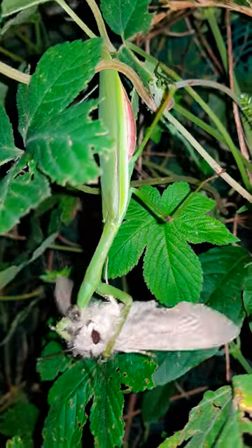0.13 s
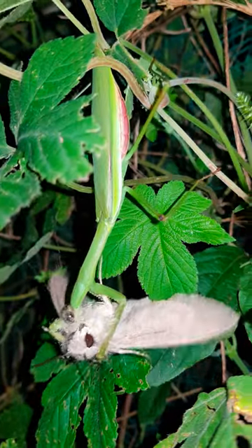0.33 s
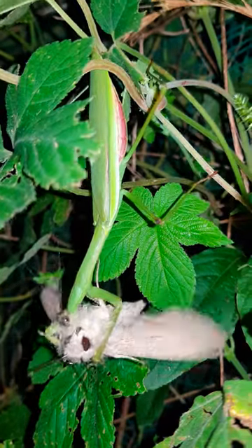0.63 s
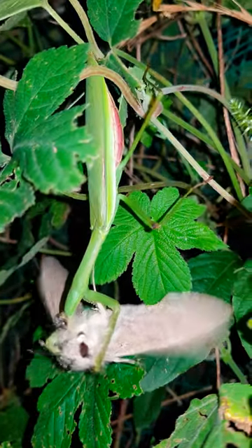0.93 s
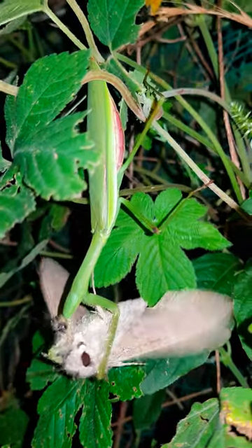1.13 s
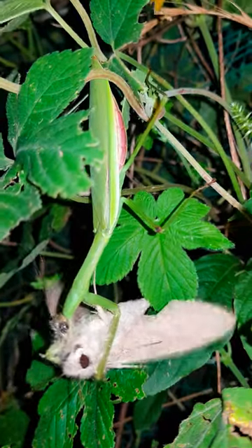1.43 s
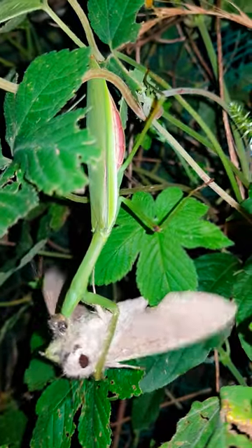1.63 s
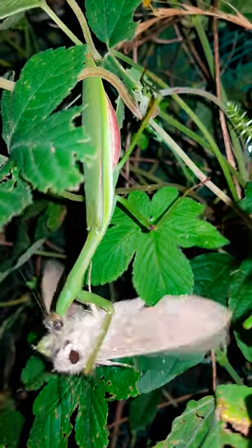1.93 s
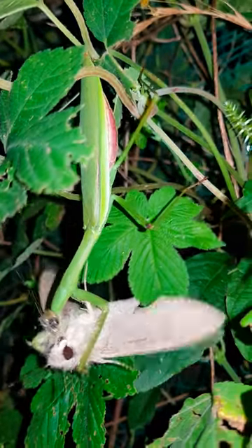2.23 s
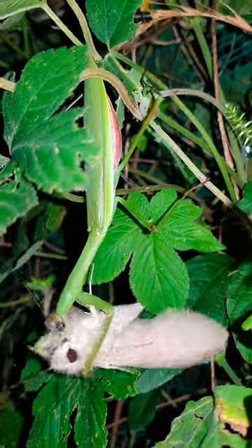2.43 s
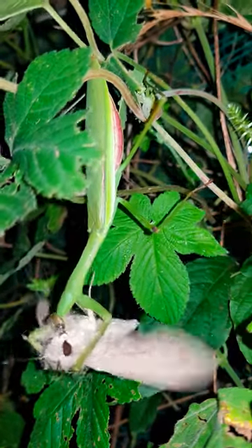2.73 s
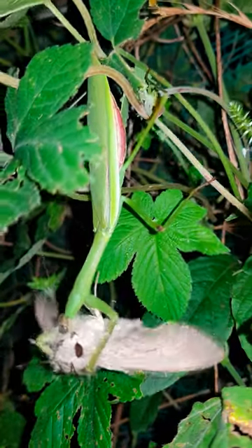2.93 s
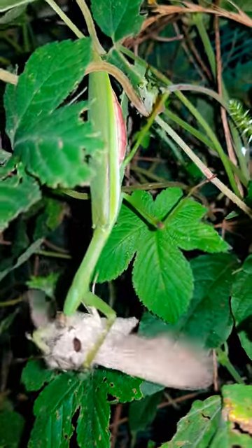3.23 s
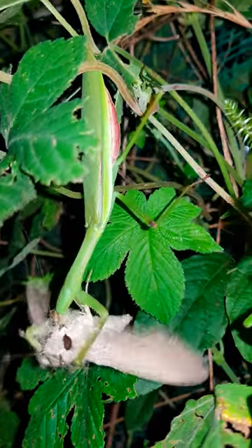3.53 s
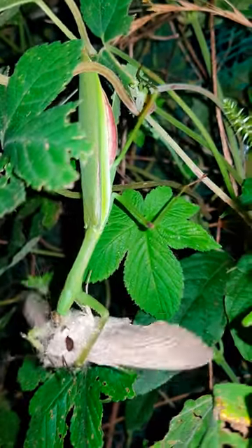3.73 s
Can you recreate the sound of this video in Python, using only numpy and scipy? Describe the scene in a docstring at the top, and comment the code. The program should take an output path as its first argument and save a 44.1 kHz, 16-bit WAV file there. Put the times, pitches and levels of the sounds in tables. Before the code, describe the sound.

Night insects trill and rasp continuously in weedy vegetation over a low distant vehicle rumble that grows.

```python
"""Insects in a verge at night

Crickets and katydids sing near and far in a weedy verge while a vehicle draws closer on a distant road.
Each cricket pulse is one wing stroke, a short tone sliding down; katydids rasp in bursts of treble noise.
The vehicle and the blur of far insects are shaped noise; a chorus sums many scattered strokes.
Small knocks are damped rings, and leaves and ground scatter the crickets and knocks into a short tail."""
import sys
import numpy as np
from scipy import signal
from scipy.io import wavfile
from scipy.ndimage import uniform_filter1d

SR = 44100
rng = np.random.default_rng(int(sys.argv[2]) if len(sys.argv) > 2 else 0)


def output_pcm(signal):
    """Save a mono or channel-first signal as 16-bit PCM at the path in sys.argv[1].

    Samples are clipped to [-1, 1] before scaling.
    """
    pcm = np.clip(np.atleast_2d(signal).T, -1, 1) * 32767
    wavfile.write(sys.argv[1], SR, np.round(pcm).astype(np.int16))


def boost(x):
    """Linear amplitude factor 10**(x/20) for a level x in decibels (scalar or array-like)."""
    u = np.asarray(x, float) / 20
    return 10 ** u


N = 170667
T = np.arange(N) / SR  # time in s

# Levels in the tables are relative; some sources are scaled again where they are mixed.
# Pan is left minus right.

# distant vehicle: [t/s, engine rumble level/dB, tyre roar level/dB, tyre hiss level/dB]
VEHICLE_SWELL = [(0, -46.5, -46, -53.5), (.5, -45.5, -48.5, -51), (1, -45, -46, -48.5),
                 (1.6, -44.5, -46.5, -47), (2, -44.5, -43.5, -50.5), (2.8, -43.5, -45, -46),
                 (3, -42, -38.5, -44.5), (3.5, -41, -39.5, -44.5), (3.75, -39.5, -33, -44.5),
                 (3.87, -37.5, -28.5, -45)]
# mean spectrum of the road: [f/Hz, density level/dB per Hz]
ROAD_SPECTRUM = [(24, -27), (40, -7.5), (81, 2.5), (141, -6), (220, -2), (270, -6), (395, -11), (453, -8),
                 (538, -10.5), (685, -2.5), (800, -4), (1170, -7.5), (1440, -16), (1710, -15),
                 (2030, -25.5), (2450, -27.5), (3180, -40), (5390, -120)]
# likeness of the road noise at left and right: [f/Hz, likeness 0 to 1]
ROAD_LIKENESS = [(60, 1), (300, 0.95), (700, 0.97), (1400, 0.69), (2500, 0.2)]
# side of the road noise: [f/Hz, pan/dB]
ROAD_SIDE = [(60, 0), (380, 4), (700, 1.5), (1300, 0.5), (2400, 4)]

# spectrum of the blur of far insects: [f/Hz, density level/dB per Hz]
FAR_SPECTRUM = [(1500, -74), (2500, -12), (3100, -23), (3640, -13), (4640, -9.5), (5660, -22),
                (6020, -18.5), (6510, -6.5), (7000, -3.5), (7400, -4.5), (8080, -13.5), (8820, -35),
                (9100, -31), (9700, -27.5), (10900, -22), (12700, -21), (15000, -17.5), (15900, -19.5)]
# side of the far insects: [f/Hz, pan/dB]
FAR_SIDE = [(2000, 3), (4700, 8.5), (6600, 10), (7200, 12), (7900, -5), (9000, 10), (10000, 6), (11200, -3),
            (13300, -13.5), (15500, -13)]

# choruses of unseen crickets: [middle f/Hz, spread f/Hz, downward slide f/Hz, stroke length/s,
# density (twice the strokes at each of seven pitches), level/dB, pan/dB]
CHORUSES = [(7050, 235, 640, 0.01416, 590, -53.5, 4.5), (4623, 337, 300, 0.0184, 500, -58, 0),
            (2665, 45, 103, 0.016, 180, -63.5, 4), (7880, 105, 720, 0.0083, 330, -65.5, -2),
            (4180, 13, 35, .028, 20, -72, 12)]

# katydid rasps: [middle t/s, level/dB]
RASP_TIMES = [(.061, -53), (.22, -52.5), (.353, -50.5), (.495, -53), (.65, -53), (.801, -56), (.949, -53),
              (1.086, -52), (1.241, -53), (1.388, -54), (1.538, -52), (1.678, -53), (1.817, -53),
              (1.967, -51.5), (2.106, -52), (2.249, -52), (2.387, -51), (2.522, -52), (2.654, -53),
              (2.792, -51.5), (2.943, -51.5), (3.084, -52), (3.214, -51), (3.342, -49), (3.475, -52),
              (3.606, -53), (3.731, -53), (3.862, -51)]
# wing resonances of the rasp: [f/Hz, width f/Hz, level/dB]
RASP_RESONANCES = [(11630, 1340, -0.33), (12840, 1050, 0), (15300, 1600, -2)]
# buzz trains of a second katydid: [middle of first beat t/s, beats/count, level/dB]
BUZZ_TRAINS = [(.019, 1, -48), (.28, 7, -52), (.797, 7, -51), (1.315, 7, -51.5), (1.823, 7, -52),
               (2.334, 7, -49), (2.831, 7, -49.5), (3.276, 8, -50.5)]

# wing strokes: [start f/Hz, end f/Hz, length/s, pan/dB]
TREE_STROKE = (2685, 2590, 0.021, 11)
FIELD_STROKE = (5420, 4650, 0.0092, 3.2)
LOW_FIELD_STROKE = (4820, 4400, 0.012, 9.8)
QUICK_STROKE = (4360, 3900, 0.012, 9.7)
SOFT_STROKE = (3845, 3820, 0.062, 4.4)
STEADY_STROKE = (7310, 6520, 0.021, 1.8)

# level of the steady singer: [t/s, level/dB]
STEADY_SWELL = [(0, -41), (.3, -40.5), (.75, -51), (1.1, -42), (3.87, -39.5)]
# tree cricket chirps: [middle of first stroke t/s, strokes/count, level/dB]
TREE_SONG = [(.045, 3, -45.5), (.171, 3, -48), (.296, 2, -49), (.355, 2, -51), (.456, 2, -47.5),
             (.553, 3, -46.5), (.68, 3, -47.5), (.841, 3, -51), (.934, 3, -44.5), (1.065, 3, -46.5),
             (1.162, 1, -52), (1.222, 2, -47), (1.42, 1, -50), (1.572, 3, -50), (1.318, 3, -48),
             (1.472, 2, -52), (1.539, 1, -49), (1.658, 1, -51), (1.722, 3, -49), (1.853, 3, -45.5),
             (1.974, 2, -44), (2.1, 3, -47), (2.231, 3, -48), (2.354, 3, -47.5), (2.471, 1, -48),
             (2.513, 2, -48), (2.581, 2, -50), (2.642, 3, -47), (2.765, 2, -49), (2.824, 1, -47),
             (2.89, 3, -53), (3.018, 3, -51), (3.131, 2, -61), (3.249, 3, -56), (3.396, 2, -52),
             (2.982, 1, -58), (3.19, 2, -57), (3.467, 2, -55), (3.538, 1, -52), (3.569, 1, -46),
             (3.76, 2, -49), (3.634, 3, -47), (3.821, 2, -48)]
# chirps of a faint low singer: [middle of first stroke t/s, strokes/count, level/dB]
SOFT_SONG = [(.355, 9, -58), (2.43, 4, -60), (2.69, 4, -56)]
# field cricket chirps: [middle of last stroke t/s, strokes/count, level/dB of last stroke]
FIELD_SONG = [(.227, 2, -58), (.392, 4, -46), (.563, 4, -43), (2.264, 4, -43), (2.432, 4, -46),
              (2.61, 4, -43)]
# chirps of a lower field cricket: [middle of last stroke t/s, strokes/count, level/dB of last stroke]
LOW_FIELD_SONG = [(1.012, 2, -55), (1.188, 2, -48.5), (1.867, 2, -51), (3.497, 2, -50), (3.666, 3, -44.5),
                  (3.834, 3, -41)]
# a brief chirr of quick strokes, in two interleaved rows: [middle of first stroke t/s, strokes/count, level/dB]
QUICK_SONG = [(2.807, 5, -52), (2.821, 4, -51)]

# small knocks and ticks: [t/s, f/Hz, width f/Hz, level/dB]
KNOCK_RINGS = [(1.292, 4000, 3500, -7), (2.948, 735, 50, -23.5), (3.16, 1010, 60, -25.5),
               (3.574, 1550, 250, -19), (3.59, 1670, 200, -25), (3.603, 1660, 200, -23),
               (3.614, 1600, 260, -13.5), (3.623, 1720, 200, -24)]


def evened(x):
    """Normalisation: a signal divided by its root mean square has rms 1."""
    return x / np.sqrt(np.mean(x ** 2) + 1e-20)


def read(points, hz):
    """Logarithmic pitch: (f/Hz, value) points are joined by straight lines on a log axis."""
    f, value = np.transpose(points)
    return np.interp(np.log(hz + 1), np.log(f + 1), value)


def sides(pan_db):
    """Level difference between the sides: each channel takes half of it, with opposite sign."""
    return boost(np.multiply.outer([0.5, -0.5], pan_db))


def clicks(times, dbs):
    """Impulse train: one impulse at each time in an otherwise silent track."""
    track = np.zeros(N + SR)
    at = np.clip(np.round(np.asarray(times) * SR).astype(int), 0, N)
    np.add.at(track, at, boost(dbs))
    return track[:N]


def noise(field_db, same, pan_db, patchy_db):
    """Partial coherence: random short-time spectra share a part between sides, in drifting patches."""
    size, hop = 1024, 256
    hz = np.fft.rfftfreq(size, 1 / SR)[:, None]
    a, b, c, d, patches = rng.standard_normal((N // hop + 5, size // 2 + 1, 5)).T
    patches = uniform_filter1d(patches, 10, 0)  # smooth over frequency
    patches = evened(uniform_filter1d(patches, 14, 1))  # smooth over time
    likeness = np.clip(same(hz), 0, 1)
    left = a + 1j * b
    right = likeness * left + np.sqrt(1 - likeness ** 2) * (c + 1j * d)
    t = np.arange(patches.shape[1]) * hop / SR
    gain = boost(field_db(hz, t) + patchy_db * patches)
    spectra = np.array([left, right]) * sides(pan_db(hz)) * gain
    return signal.istft(spectra, nperseg=size, noverlap=size - hop)[1][:, :N]


def vehicle():
    """Broadband road noise: rumble, roar and hiss occupy successive bands and swell separately."""
    roar_from_hz, hiss_from_hz = 517, 836
    level_db, right_late_samples = -38.0, 2  # the road lies to the left
    s, rumble, roar, hiss = np.transpose(VEHICLE_SWELL)

    def field(hz, t):
        """Crossover: smooth weights divide the spectrum among the three bands."""
        rumble_db, roar_db, hiss_db = (np.interp(t, s, v - v.mean()) for v in (rumble, roar, hiss))
        above_rumble = 1 / (1 + (roar_from_hz / (hz + 1)) ** 6)
        above_roar = 1 / (1 + (hiss_from_hz / (hz + 1)) ** 6)
        swell = rumble_db * (1 - above_rumble) + roar_db * (above_rumble - above_roar) + hiss_db * above_roar
        return read(ROAD_SPECTRUM, hz) + swell

    road = noise(field, lambda f: read(ROAD_LIKENESS, f), lambda f: read(ROAD_SIDE, f), patchy_db=0.94)
    left, right = boost(level_db) * evened(road)
    return np.array([left, np.roll(right, right_late_samples)])


def far():
    """Superposition: far insects blur into a hiss almost unlike at the two sides."""
    blur = noise(lambda f, t: read(FAR_SPECTRUM, f), lambda f: 0.057 + 0 * f,
                 lambda f: read(FAR_SIDE, f), patchy_db=1.66)
    return boost(-47.5) * evened(blur)


def chorus():
    """Random superposition: unseen singers at scattered pitches stroke at chance times on each side."""
    out = np.zeros((2, N))
    for hz, spread, slide, length, density, db, pan_db in CHORUSES:
        layer = np.zeros((2, N))
        u = np.arange(0, length, 1 / SR) / length
        for off in np.linspace(-1.6, 1.6, num=7):
            turns = np.cumsum(hz + spread * off + slide * (0.5 - u)) / SR
            tone = np.sin(np.pi * u) * np.sin(2 * np.pi * turns)
            side, when, strength = rng.random((round(density / 2), 3)).T
            track = np.zeros((2, N))
            # pitches far from the middle are weaker
            track[(side * 2).astype(int), (when * N).astype(int)] = boost(7.5 * strength - 4.0 * off ** 2)
            layer += signal.oaconvolve(track, tone[None], axes=1)[:, :N]
        out += boost(db) * sides(pan_db)[:, None] * evened(layer)
    return out


def resonate(x, hz, width):
    """Resonance: two equal one-pole low-passes about a carrier pass a band with gain 1 at its centre."""
    carrier = np.exp(2j * np.pi * hz * T)
    r = np.exp(-np.pi * width / SR)
    low = x / carrier
    for _ in range(2):
        low = signal.lfilter([1 - r], [1, -r], low)
    return 2 * (carrier * low).real


def katydids():
    """Stridulation as gated noise: scraping excites wing resonances in short bursts."""
    rasp_s, rasp_pan_db = 0.046, -12
    buzz_hz, buzz_width_hz, buzz_gap_s, buzz_s, buzz_pan_db = 12800, 1100, 0.0347, 0.031, -12
    rasp_scrape, buzz_scrape = rng.standard_normal((2, 2, N))
    rasp = evened(sum(boost(db) * evened(resonate(rasp_scrape, hz, w)) for hz, w, db in RASP_RESONANCES))
    rasp_burst = np.bartlett(round(rasp_s * SR))
    rasp *= signal.oaconvolve(clicks(*np.transpose(RASP_TIMES)), rasp_burst, "same")

    beats = [(s + k * buzz_gap_s, db) for s, n, db in BUZZ_TRAINS for k in range(round(n))]
    buzz = evened(resonate(buzz_scrape, buzz_hz, buzz_width_hz))
    buzz_burst = np.hanning(round(buzz_s * SR))
    buzz *= signal.oaconvolve(clicks(*np.transpose(beats)), buzz_burst, "same")
    return boost(-2.5) * rasp * sides(rasp_pan_db)[:, None] + boost(-9.0) * buzz * sides(buzz_pan_db)[:, None]


def strokes(track, hz0, hz1, length, pan_db=0., lean_db=0.):
    """Frequency glide: each impulse becomes one sliding, slightly uneven tone at a chance phase."""
    bend, edge = 1.37, 0.52  # the slide steepens; the ends are blunt
    stray_part, rough, rough_s = 0.0025, 0.2, 0.0022  # pitch strays; teeth catch unevenly
    u = np.arange(0, length, 1 / SR) / length
    turns = np.cumsum(hz0 + (hz1 - hz0) * u ** bend) / SR
    shape = np.sin(np.pi * u) ** edge * sides(pan_db + lean_db * (2 * u - 1))
    out = np.zeros((2, N + 2 * len(u)))
    at = np.flatnonzero(track)
    for i, phase, stray in zip(at, rng.random(len(at)), rng.standard_normal(len(at))):
        tone = np.cos(2 * np.pi * (phase + turns * (1 + stray_part * stray)))
        out[:, i:i + len(u)] += track[i] * shape * tone
    span = round(rough_s * SR)
    catch = uniform_filter1d(rng.standard_normal(N), span)
    catch = evened(uniform_filter1d(catch, span))
    centred = out[:, len(u) // 2:][:, :N]  # the impulse marks the middle of the stroke
    return centred * (1 + rough * catch)


def chirps(table, gap_s, step_db, kind):
    """Periodic excitation: evenly spaced strokes form a chirp; a negative gap counts back from the last."""
    rows = np.array([(s + k * gap_s, db + k * step_db) for s, n, db in table for k in range(round(n))])
    times, dbs = rows.T
    return strokes(clicks(times, dbs + 0.59 * rng.standard_normal(len(rows))), *kind)


def crickets():
    """Stridulation as tone: near singers stand out by pitch, stroke rate and side."""
    steady_per_s, steady_first_s = 29.283, 0.0172
    steady_lean_db = 9  # the right side hears the high start of a stroke, the left its low end
    field_gap_s, swell_db = 0.015, -1  # field chirps start soft: each earlier stroke is weaker
    times = np.arange(steady_first_s, T[-1], 1 / steady_per_s)
    dbs = np.interp(times, *np.transpose(STEADY_SWELL)) + 0.69 * rng.standard_normal(len(times))
    steady = strokes(clicks(times, dbs), *STEADY_STROKE, steady_lean_db)
    tree = boost(-5.5) * chirps(TREE_SONG, 0.031, 0, TREE_STROKE)
    soft = chirps(SOFT_SONG, 0.058, 0, SOFT_STROKE)
    quick = chirps(QUICK_SONG, 0.025, 0, QUICK_STROKE)
    field = chirps(FIELD_SONG, -field_gap_s, swell_db, FIELD_STROKE)
    low_field = chirps(LOW_FIELD_SONG, -field_gap_s, swell_db, LOW_FIELD_STROKE)
    return steady + tree + soft + quick + field + low_field


def leaves(x):
    """Scattering: leaves and ground add a short decaying random tail, different on each side."""
    level_db, t60_s = -14.5, 0.065
    t = T[:SR // 5]
    tail = rng.standard_normal((2, len(t))) * boost(-60 * t / t60_s)
    tail /= np.linalg.norm(tail[0])
    return x + boost(level_db) * signal.oaconvolve(x, tail, axes=1)[:, :N]


def knocks():
    """Damped oscillation: each knock rings with a soft start and an exponential decay."""
    rise_cycles = 1.8
    t = T[:2000]
    out = np.zeros(N)
    for s, hz, width, db in KNOCK_RINGS:
        rise = 1 - np.exp(-t * hz / rise_cycles)
        ring = rise * np.exp(-np.pi * width * t) * np.sin(2 * np.pi * hz * t)
        out += signal.oaconvolve(clicks([s], [db]), ring)[:N]
    return out


def scene():
    """Linear superposition: the sources add, with scatter on the crickets and knocks alone."""
    scattered = leaves(boost(-3.0) * crickets() + knocks())
    return vehicle() + far() + chorus() + scattered + katydids()


def top_cut(x):
    """Nothing passes above the cut-off."""
    return signal.sosfilt(signal.butter(12, 16650, fs=SR, output="sos"), x)


def record(dry):
    """Band limitation: a high-pass removes the lowest bass and a low-pass the extreme treble."""
    low_cut_hz, top_hz = 42, 15730
    high_pass = signal.butter(N=3, Wn=low_cut_hz, btype="high", fs=SR, output="sos")
    low_pass = signal.firwin(numtaps=511, cutoff=top_hz, fs=SR)
    mix = signal.sosfilt(high_pass, dry)
    mix = signal.oaconvolve(mix, low_pass[None], "same", axes=1)
    return top_cut(mix)


dry = scene()
out = record(dry)
output_pcm(out)
```